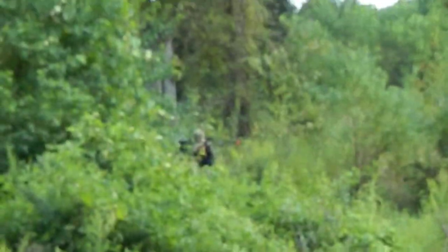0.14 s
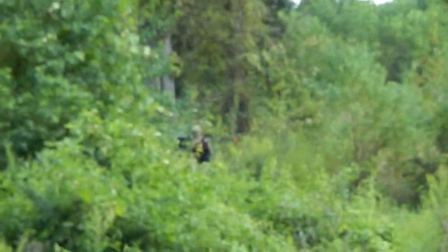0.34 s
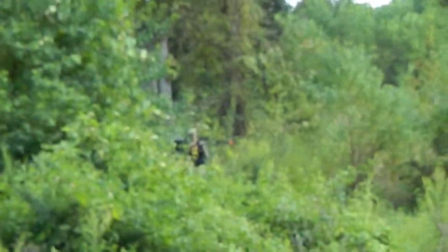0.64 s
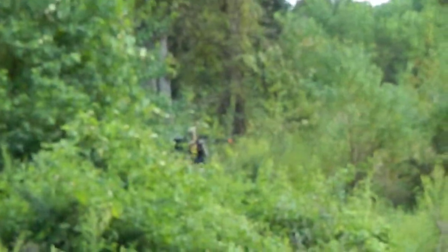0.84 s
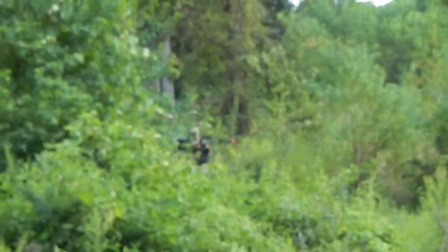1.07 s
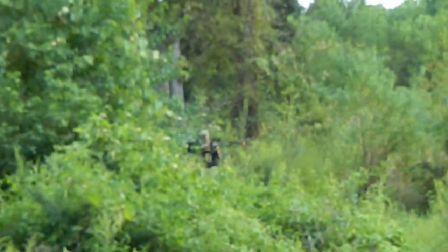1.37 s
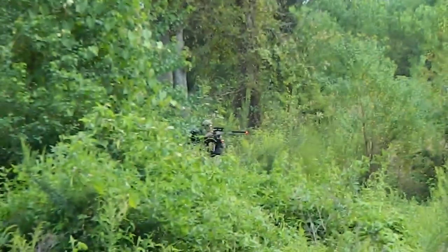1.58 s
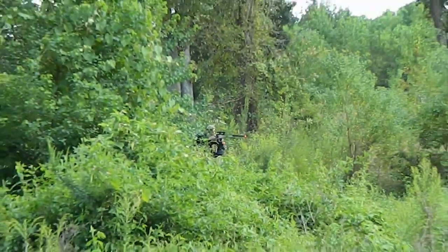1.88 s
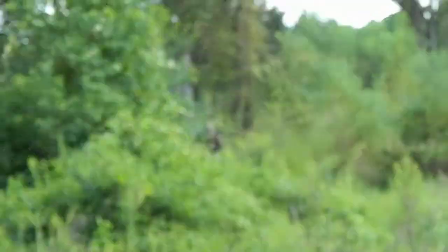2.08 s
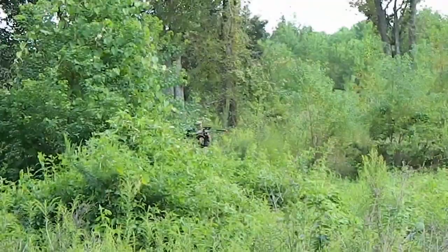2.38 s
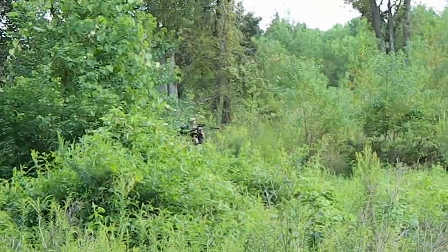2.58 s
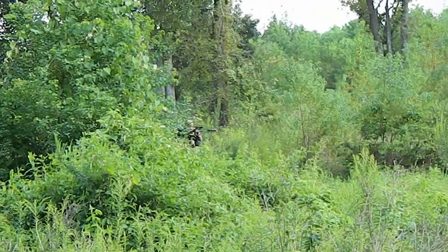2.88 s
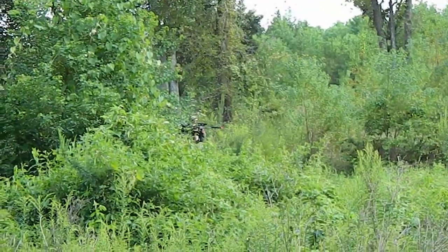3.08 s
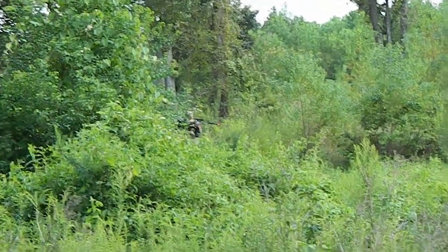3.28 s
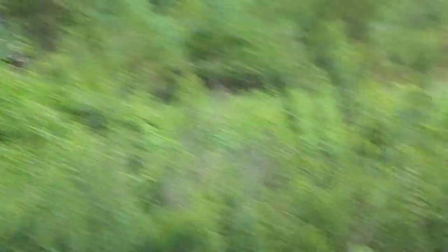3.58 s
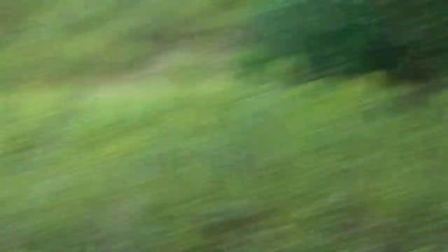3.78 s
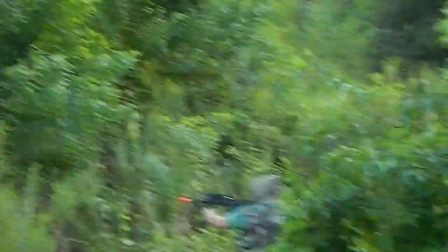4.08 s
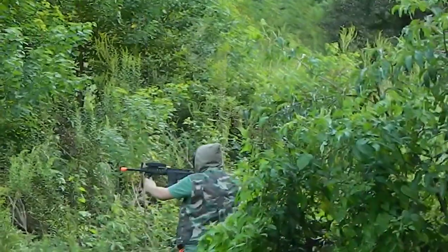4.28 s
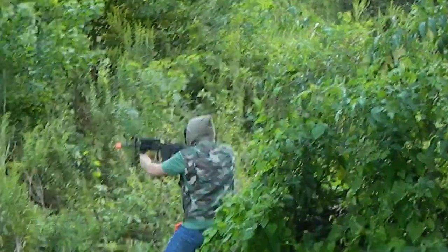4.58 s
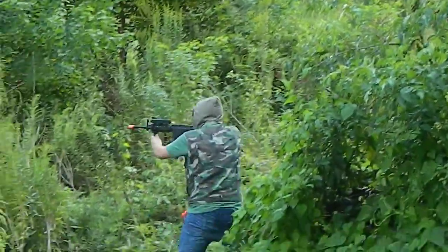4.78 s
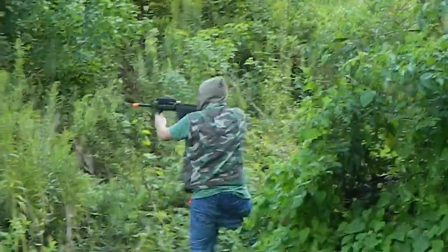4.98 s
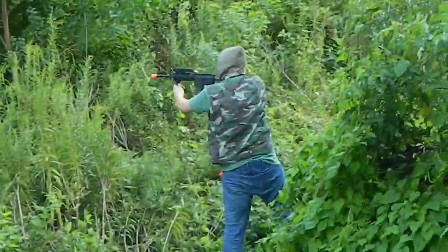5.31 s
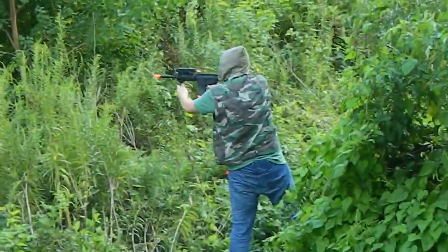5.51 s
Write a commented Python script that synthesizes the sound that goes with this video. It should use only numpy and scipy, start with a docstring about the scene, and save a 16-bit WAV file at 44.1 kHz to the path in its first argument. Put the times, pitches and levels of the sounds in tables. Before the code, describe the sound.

A steady high insect hiss with soft low air rumble fills overgrown brush, heard by a hand-held mono camera microphone. At 1.2 s a faint twig snap and rising motor chirp lead into a close electric airsoft rifle: from 1.3 to 2.3 s, sixteen metallic piston slams, about fifteen per second, over whirring gears. A low zoom hum runs underneath from 1.6 to 2.4 s. After 2.0 s the shots become quieter, duller and more rattly, as if empty. Small snaps, rustles and camera bumps follow. Two dull shots come at 3.6-3.7 s, then sharp loud snaps and a knock around 3.76-3.82 s; the hiss abruptly dips, and a very faint last shot lands at 3.9 s. The hiss partly returns with a barely audible tone, brushed leaves and twig ticks, and a dry scrape at 4.9 s. From 5.13 s a second, louder rifle fires eight hard cracks, gears whining downward between shots, with short leafy echoes.

```python
"""Overgrown brush, hand-held mono camera: insect hiss all around, a twig snap, then an electric airsoft
rifle winds up and fires close by, piston slams ringing its body over whirring gears, while the zoom hums.
It runs dry and turns dull, and fires three last shots among snaps and bumps; the hiss dips at 3.8 s and
partly returns. A faint tone and brushed leaves follow, then a second rifle's burst, whining between shots.
Impulses through resonances make the blows, shaped noise the whirr and hiss, sines the notes."""
import sys
import numpy as np
from scipy import signal
from scipy.io import wavfile
from scipy.ndimage import uniform_filter1d

SR = 44100
rng = np.random.default_rng(int(sys.argv[2]) if len(sys.argv) > 2 else 0)


def persist_wave(psi):
    """Save psi, clipped to +-1, as 16-bit WAV."""
    counts = np.round(np.clip(psi, -1, 1) * 32767).astype(np.int16)
    wavfile.write(sys.argv[1], SR, np.atleast_2d(counts).T)


N = 249165  # samples, 5.65 s

# Shots of the first rifle. Each row: time in seconds, direct peak in dB.
FIRST_SHOTS = [(1.296, -12), (1.3797, -12.5), (1.4479, -13), (1.515, -12.5), (1.5821, -12.5),
               (1.6479, -12.5), (1.713, -13.5), (1.7766, -13), (1.8395, -13), (1.9026, -13),
               (1.9669, -13.5), (2.0326, -19.5), (2.0976, -18.5), (2.1643, -19), (2.2325, -18),
               (2.2987, -19.5), (3.6218, -19), (3.7045, -19), (3.8985, -31.5)]
# Ringing modes of the first rifle's body. Each row: centre in Hz, width in Hz, relative level in dB.
FIRST_BODY = [(609, 260, 6.5), (802, 140, -2), (1826, 330, 8), (2440, 160, -1), (2970, 580, 7.5),
              (3730, 2400, 3), (4880, 300, -10), (6540, 680, 2.5), (7880, 1130, 6), (8950, 3200, 2),
              (11350, 1600, -15)]
# Shots of the second rifle. Each row: time in seconds, direct peak in dB.
SECOND_SHOTS = [(5.131, -6.5), (5.2173, -9.5), (5.289, -10), (5.3593, -9.5), (5.4299, -9), (5.5001, -8),
                (5.5705, -9), (5.6404, -9.5)]
# Ringing modes of the second rifle's body. Each row: centre in Hz, width in Hz, relative level in dB.
SECOND_BODY = [(346, 65, 4.5), (660, 320, -6), (758, 230, -0.5), (1326, 580, 2), (1970, 1300, 4),
               (4000, 930, 5), (4760, 1300, 10.5), (5400, 1000, 3.5), (6940, 1100, -26), (8400, 920, -9),
               (13800, 4500, -27)]
# First motor at full speed, trigger held. Each row: start in seconds, end in seconds, level in dB.
FIRST_PULLS = [(1.33, 2.33, -41.5), (3.62, 3.77, -48)]
# Spectrum of the first rifle's gears. Each row: frequency in Hz, relative density in dB per Hz.
FIRST_WHIRR = [(120, -74), (200, 1.5), (397, -2.5), (540, -22), (708, -7), (896, -3.5), (1240, -17),
               (1780, -4), (2380, -9.5), (3060, -6.5), (5550, -11.5), (8410, -0.5), (15000, -24)]
# Second motor at full speed, trigger held. Each row: start in seconds, end in seconds, level in dB.
SECOND_PULLS = [(5.17, 5.7, -38.5)]
# Spectrum of the second rifle's gears. Each row: frequency in Hz, relative density in dB per Hz.
SECOND_WHIRR = [(120, -51), (200, -24), (451, -7), (602, -13), (896, 0.5), (1070, -11), (1510, -26),
                (1660, -13), (2750, -4), (3290, -6.5), (3670, -3.5), (5070, -1), (6800, -4.5),
                (8200, -13.5), (15000, -25)]
# First rifle's motor starting. Each row: time in seconds, pitch in Hz, level in dB before the tone mix.
MOTOR_START = [(1.235, 640, -55), (1.265, 760, -49), (1.305, 1120, -47)]
# Twigs and pellets striking near by. Each row: start in seconds, peak in dB without the tick,
# centre in Hz, crackle decay by 60 dB in seconds, bright tick in dB relative to that peak.
NEAR_SNAPS = [(1.206, -34.5, 2000, 0.014, -18), (1.348, -21, 3300, 0.013, -26),
              (2.133, -18, 4010, 0.014, -22), (2.407, -20.5, 7200, 0.023, -25),
              (2.58, -28, 1940, 0.023, -7), (2.788, -33.5, 695, 0.027, -25),
              (3.257, -27.5, 560, 0.014, -32), (3.535, -36.5, 1880, .014, -15),
              (3.618, -31, 2880, 0.032, -21), (3.736, -21.5, 1100, 0.016, -7), (3.751, -21, 9500, .012, -9),
              (3.7593, -23, 9500, .008, -7), (3.7634, -7, 1060, 0.015, -6), (3.771, -26, 700, 0.034, -7),
              (3.778, -23, 9000, 0.0078, -12), (3.7937, -17.5, 835, 0.021, -0.5),
              (3.804, -24.5, 835, 0.1, -18), (3.821, -3, 5300, 0.012, -43), (3.836, -27.5, 1500, .012, -20),
              (3.975, -29.5, 3240, .008, -23), (4.255, -22, 2840, 0.013, -31),
              (4.334, -25, 780, 0.017, -15), (4.555, -34.5, 3300, .009, -19),
              (4.628, -23, 6800, 0.023, -14), (4.64, -18, 3400, 0.018, -17), (4.7, -37, 1000, .009, 5),
              (4.808, -36, 1800, .012, -17), (4.91, -25.5, 3600, 0.085, -35)]
# Bumps on the camera body. Each row: time in seconds, level in dB before onset and shell, pitch in Hz.
CAMERA_BUMPS = [(1.342, -13.5, 355), (1.617, -24, 173), (2.551, -28, 335), (2.778, -31.5, 272),
                (3.249, -24, 230), (3.2566, -11.5, 278), (3.28, -23.5, 330), (3.762, -7, 404),
                (3.774, -16.5, 290), (3.818, -33, 117), (3.998, -38, 306), (4.446, -30, 233),
                (4.642, -25.5, 333), (4.908, -27, 97)]
# Zoom motor. Each row: time in seconds, pitch in Hz, level in dB before the tone mix.
ZOOM_MOTOR = [(1.58, 150.6, -51), (1.72, 104, -46), (2.33, 102.9, -44), (2.42, 97, -71)]
# Hands and wind on the camera. Each row: time in seconds, level in dB.
HANDLING = [(0, -61), (1.05, -63), (1.46, -52), (2.14, -47), (2.36, -63.5), (3.67, -51), (3.93, -69.5),
            (4.61, -55.5), (5.65, -60)]
# Clothes and feet shifting near the camera. Each row: time in seconds, level in dB.
CLOTHES_AND_FEET = [(2.3, -52), (2.82, -61.5), (3.4, -51.5), (4.39, -55.5), (5.65, -53)]
# Leaves brushed by a moving body. Each row: start in seconds, end in seconds, level in dB.
BRUSHED_LEAVES = [(2.133, 2.14, -39), (2.3, 2.57, -51.5), (2.77, 2.8, -57.5), (3.74, 3.78, -45.5),
                  (4.25, 5.15, -57.5), (4.26, 4.36, -60), (4.55, 4.66, -55), (4.912, 4.93, -49),
                  (4.96, 5.05, -61), (5.1, 5.13, -48.5)]
# Dry scraping hiss. Each row: lower edge in Hz, then a curve of time in seconds, level in dB.
DRY_SCRAPES = [(3900, [(1.33, -53), (1.44, -49), (1.5, -54)]), (2880, [(2.395, -44), (2.48, -48.5),
               (2.58, -55)]), (3300, [(4.905, -35), (5.02, -84)])]
# Faint tone in the field. Each row: time in seconds, pitch in Hz, level in dB.
FIELD_TONE = [(3.86, 1830, -62), (4.05, 1880, -61), (4.25, 1930, -62)]
# Insects, with the air and far traffic under them. Each row: frequency in Hz, relative dB per Hz.
FIELD_SPECTRUM = [(12, -51.5), (20, -7), (65, -1.5), (108, -11.5), (184, -16), (230, -30), (273, 1.5),
                  (314, -12), (566, -13), (1510, -20), (4790, -24.5), (5900, -22), (8650, -5.5),
                  (13600, -14.5), (15200, -25.5), (16500, -64)]

EMPTY_S = 2.0  # the first rifle's magazine runs out
# relative to the blow: (thud dB, crack dB, rattle dB, loose parts dB)
FIRST_LOADED, SECOND_LOADED = (-1.5, 5.5, -30, -35), (0, 5.5, -26.5, -40)
DRY = (13.5, 2.5, -15, 11)
DETUNE = 0.02  # random spread (share) of each mode's pitch from shot to shot
WIND_UP_DB_PER_S, COAST_DB_PER_S = 236, 130
FIRST_FLICKER_DB, SECOND_FLICKER_DB = 0.6, 2.4
WHINE_DB, WHINE_SPREAD_DB = -36.5, 2.5  # high note before swell and rasp
LOW_NOTE_DB = -42.5
SPIN_UP_ROUGH, ZOOM_ROUGH = 0.6, 0.35  # weight of narrow noise against sine
SNAP_WIDTH = 0.86  # share of the centre
BUMP_CYCLES = 3.85  # to die by 60 dB
BRUSH_DB_PER_S, SETTLE_DB_PER_S = 500, 164
FIELD_DB, DROP_S, DROP_DB = -45.5, 3.826, -13.5
REGAIN_DB, HOLD_S, CREEP_S = 7.5, 0.13, 0.57
NOTCH_HZ, EDGE_HZ = 7870, 15800


def rifle(shots, body, loaded, empty_s, rattle_t60, nozzle_db, rebound_db, thud_lag):
    """The nozzle ticks, the piston slams and rebounds, loose parts rattle; the body's modes ring."""
    out, t = np.zeros(N), np.arange(2200) / SR
    slam = 90  # samples into the shot
    own = rng.standard_normal(len(t))  # the same parts rattle alike in every shot
    chances = rng.standard_normal((len(shots), len(t)))
    for (s, db), chance in zip(shots, chances):
        # with no pellet to cushion it the piston thuds and rattles harder
        thud_db, crack_db, rattle_db, loose_db = DRY if s > empty_s else loaded
        rattle_gain = gain_of(rattle_db - 60 * abs(t - slam / SR) / rattle_t60)
        blow = (.8 * own + .5 * chance) * rattle_gain
        blow[slam - 66] -= gain_of(nozzle_db)
        blow[slam] -= 1
        blow[slam + 52] -= gain_of(rebound_db)
        heavy = np.roll(blow, thud_lag)  # the stock and cylinder move out of step with the crack
        ring = gain_of(loose_db) * band(blow, 2400, 4000, order=2)
        for (hz, width, mode_db), shift in zip(body, 1 + DETUNE * chance[::-1]):
            struck = heavy if hz < 1200 else blow
            mode = resonate(resonate(struck, hz * shift, width), hz * shift, width)
            tilt_db = thud_db * (hz < 1200) + crack_db * (hz > 5500)
            ring += gain_of(mode_db + tilt_db) * np.sqrt(500 / width) * mode
        ring *= np.minimum(t / 0.0017, 1)
        add(out, s - 36 / SR, gain_of(db) * ring / abs(ring).max())
    return out


def gears(pulls, whirr, flicker_db):
    """Motor and gear teeth: flickering noise winds up, holds with the trigger and coasts down."""
    return held(pulls, WIND_UP_DB_PER_S, COAST_DB_PER_S) * noise(whirr, 2.8, flicker_db)


def squeals():
    """As the second rifle's spring loads, gear teeth sing a sagging, swelling note over a low throb."""
    out, fired = np.zeros(N), [row[0] for row in SECOND_SHOTS]
    levels_db = WHINE_DB + WHINE_SPREAD_DB * rng.standard_normal(len(fired))
    for start, end, db in zip(fired, fired[1:], levels_db):
        u = np.linspace(0, 1, round((end - start) * SR))  # progress from shot to shot
        swell = .33 * np.exp(-((u - .58) / .2) ** 2) + np.exp(-((u - .8) / .08) ** 2)
        rasp = 1 + .4 * evened(uniform_filter1d(rng.standard_normal(len(u)), 90))  # uneven teeth
        high = swell * rasp * sine(2900 - 620 * u)
        throb = np.exp(-((u - .55) / 0.14) ** 2)
        low = gain_of(LOW_NOTE_DB) * throb * sine(900 - 70 * u)
        add(out, start, gain_of(db) * high + low)
    return out


def brush(x):
    """Trunks and leaves scatter the sound back as a short diffuse tail."""
    t = np.arange(SR // 2) / SR
    decay = gain_of(-60 * t / .35) * np.clip(t / .008, 0, 1)
    tail = band(rng.standard_normal(len(t)) * decay, 300, 7000, order=1)
    return signal.fftconvolve(x, tail / np.linalg.norm(tail))[:N]


def snaps():
    """A dying crackle through one broad resonance, with a short bright tick."""
    out, t = np.zeros(N), np.arange(2600) / SR
    chances = rng.standard_normal((len(NEAR_SNAPS), len(t)))
    for (s, db, hz, t60, tick_db), chance in zip(NEAR_SNAPS, chances):
        crackle = .2 * chance * gain_of(-60 * abs(t - .001) / t60)
        crackle[44] += 1  # the break itself, 1 ms in
        snap = resonate(crackle, hz, hz * SNAP_WIDTH)
        tick = band(crackle * gain_of(-60 * t / 0.0067), 3200, 10100, order=2)
        both = snap / abs(snap).max() + gain_of(tick_db) * tick / abs(tick).max()
        add(out, s, gain_of(db) * both)
    return out


def bumps():
    """A soft push rings the camera shell for a cycle or two; the small shell passes little deep bass."""
    out, t = np.zeros(N), np.arange(4000) / SR
    for s, db, hz in CAMERA_BUMPS:
        decay = gain_of(db - 60 * t * hz / BUMP_CYCLES)
        push = 1 - np.exp(-t / .001)
        add(out, s - .001, -decay * push * np.sin(2 * np.pi * hz * t))
    return band(out, 122, 2900, order=2)


def hum(rows, width, rough):
    """A tone gliding along a pitch curve, mixed from a sine and narrow noise around it."""
    hz = follow(rows)
    fuzz = evened(resonate(rng.standard_normal(N), hz, width))
    return level(rows, order=2) * ((1 - rough) * np.sqrt(2) * sine(hz) + rough * fuzz)


def rumble():
    """Hands and wind give lumpy low noise; clothes and feet a dull shuffle above it."""
    low, dull = rng.standard_normal((2, N))
    handling = gain_of(follow(HANDLING)) * evened(band(low, 50, 172, order=2))
    shuffle = level(CLOTHES_AND_FEET) * evened(band(dull, 114, 870, order=1))
    return handling + shuffle


def rustle():
    """Dense tiny clicks of leaves: a broad band, and a sharp-edged narrow one for the scrapes."""
    grains = rng.standard_normal(N) * gain_of(2 * np.minimum(rng.exponential(1, N), 5))
    brushing = held(BRUSHED_LEAVES, BRUSH_DB_PER_S, SETTLE_DB_PER_S)
    out = brushing * evened(band(grains, 220, 6700, order=1))
    for low_hz, rows in DRY_SCRAPES:
        out += level(rows) * evened(band(grains, low_hz, 4430, order=5))
    return out


def insects():
    """Even hiss of insects and air; its level drops at once, holds, then partly creeps back."""
    since = np.arange(N) / SR - DROP_S
    regain_db = REGAIN_DB * np.clip((since - HOLD_S) / CREEP_S, 0, 1)
    db = FIELD_DB + (since > 0) * (DROP_DB + regain_db)
    return gain_of(db) * noise(FIELD_SPECTRUM, 1.0, 0.64)


def gain_of(db):
    """Turns dB into gain."""
    return 10 ** (np.asarray(db) / 20)


def evened(x):
    """Scales to rms 1."""
    return x / np.sqrt(np.mean(x ** 2) + 1e-20)


def add(mix, s, sound):
    """Mixes a sound in at s seconds, cut at the end of the mix."""
    part = mix[round(s * SR):][:len(sound)]
    part += sound[:len(part)]


def sine(hz):
    """A sine whose phase sums a changing pitch."""
    return np.sin(2 * np.pi * np.cumsum(hz) / SR)


def follow(rows, order=1):
    """One column of a curve at every sample."""
    return np.interp(np.arange(N) / SR, [r[0] for r in rows], [r[order] for r in rows])


def level(rows, order=1):
    """Gain along a curve, fading in and out over 15 ms at its ends."""
    t = np.arange(N) / SR
    to_end = np.minimum(t - rows[0][0], rows[-1][0] - t)
    return gain_of(follow(rows, order)) * np.clip(to_end / .015, 0, 1)


def held(rows, rise_db_per_s, fall_db_per_s):
    """Gain that climbs to each row's level, holds it, and falls away."""
    t, gain = np.arange(N) / SR, np.zeros(N)
    for start, end, db in rows:
        before, after = np.maximum(start - t, 0), np.maximum(t - end, 0)
        gain += gain_of(db - rise_db_per_s * before - fall_db_per_s * after)
    return gain


def band(x, lo_hz, hi_hz, order):
    """Butterworth band-pass."""
    return signal.sosfilt(signal.butter(order, [lo_hz, hi_hz], "band", fs=SR, output="sos"), x)


def resonate(x, hz, width):
    """Shifts hz down to zero, smooths, and shifts back: a resonance of gain 1."""
    turn = np.exp(2j * np.pi * np.cumsum(hz * np.ones(len(x))) / SR)
    r = np.exp(-np.pi * width / SR)
    return 2 * (turn * signal.lfilter([1 - r], [1, -r], x / turn + 1e-18)).real


def noise(spectrum, patchy_db, flicker_db):
    """Random short-time spectra with drifting patches and a flicker shared by all bins."""
    bin_hz = np.fft.rfftfreq(1024, 1 / SR)
    real, imag, chance = rng.standard_normal((N // 256 + 5, 513, 3)).T
    patches = uniform_filter1d(uniform_filter1d(chance, 12, 0), 6, 1)  # over bins, then frames
    wander_db = patchy_db * evened(patches) + flicker_db * chance[0]
    hz, db = np.transpose(spectrum)
    shape_db = np.interp(np.log(bin_hz + 1), np.log(hz), db)[:, None]
    z = (real + 1j * imag) * gain_of(shape_db + wander_db)
    return evened(signal.istft(z, nperseg=1024, noverlap=768)[1][:N])


def scene():
    """Rifles, near snaps and their echoes, camera noises and field, alike in both channels."""
    early, late = -50, 80  # samples from crack to thud
    first = rifle(FIRST_SHOTS, FIRST_BODY, FIRST_LOADED, EMPTY_S, rattle_t60=0.032,
                  nozzle_db=-51, rebound_db=-46, thud_lag=early)
    second = rifle(SECOND_SHOTS, SECOND_BODY, SECOND_LOADED, np.inf, rattle_t60=0.036,
                   nozzle_db=-37, rebound_db=-17, thud_lag=late)
    near = snaps()
    echoes = brush(gain_of(-15.5) * first + gain_of(-14.5) * second + gain_of(-34.0) * near)
    motors = gears(FIRST_PULLS, FIRST_WHIRR, FIRST_FLICKER_DB)
    motors += gears(SECOND_PULLS, SECOND_WHIRR, SECOND_FLICKER_DB)
    motors += squeals() + hum(MOTOR_START, width=100, rough=SPIN_UP_ROUGH)
    camera = bumps() + hum(ZOOM_MOTOR, width=45, rough=ZOOM_ROUGH) + rumble()
    field = insects() + rustle() + hum(FIELD_TONE, width=83, rough=1.0)
    return np.tile(first + second + near + echoes + motors + camera + field, (2, 1))


def record(dry):
    """The microphone housing cuts a narrow notch; then the band limit."""
    notched = signal.lfilter(*signal.iirnotch(NOTCH_HZ, 50, SR), dry)
    low_pass = signal.firwin(511, EDGE_HZ, window=("kaiser", 9), fs=SR)
    return signal.oaconvolve(notched, low_pass[None], "same")


dry = scene()
out = record(dry)
persist_wave(out)
```